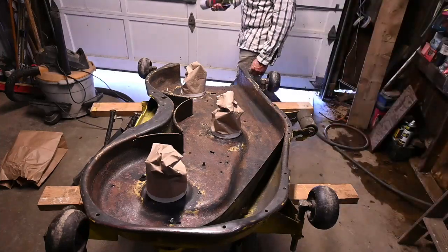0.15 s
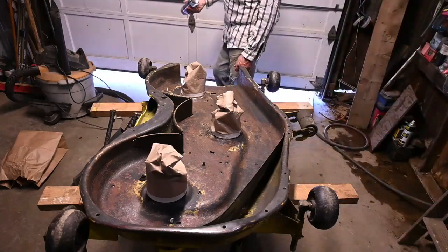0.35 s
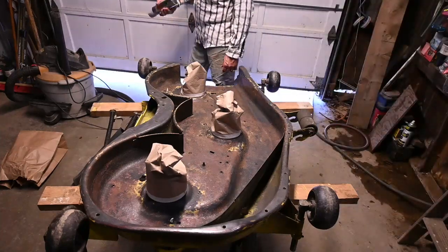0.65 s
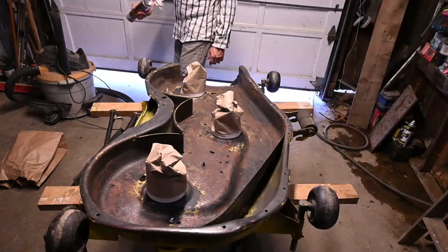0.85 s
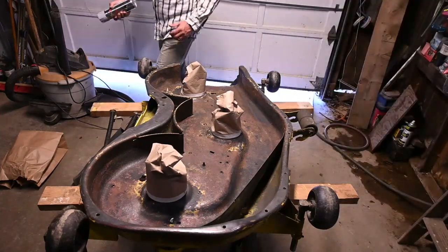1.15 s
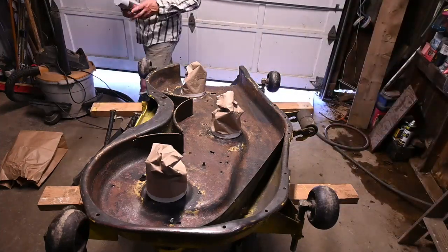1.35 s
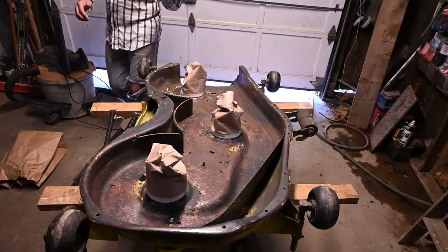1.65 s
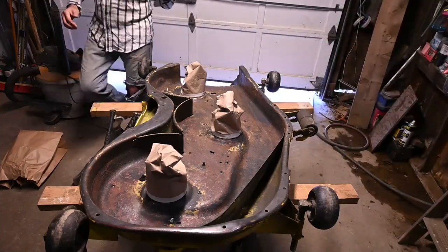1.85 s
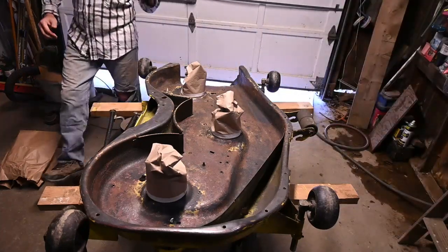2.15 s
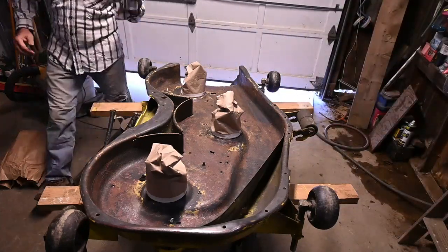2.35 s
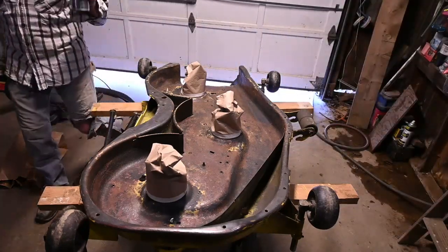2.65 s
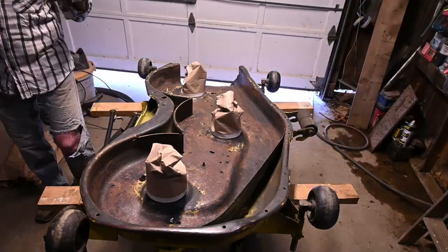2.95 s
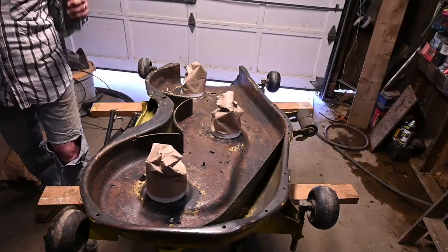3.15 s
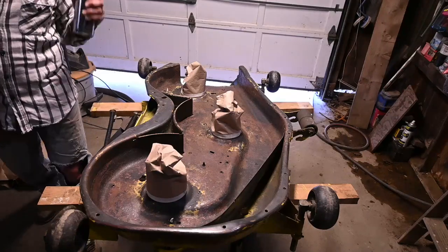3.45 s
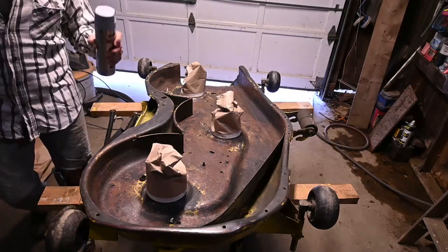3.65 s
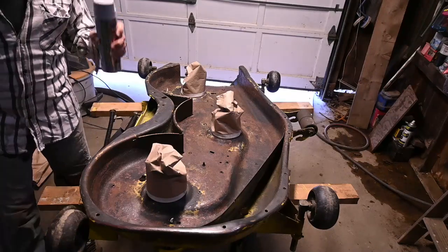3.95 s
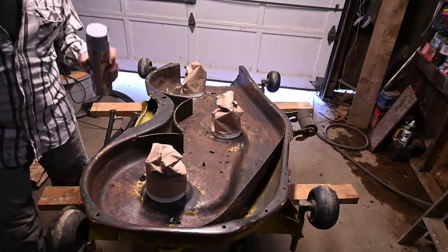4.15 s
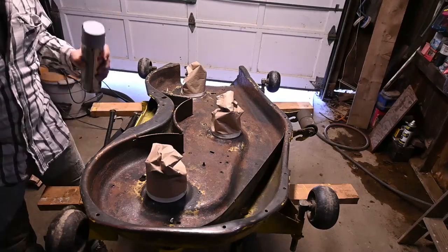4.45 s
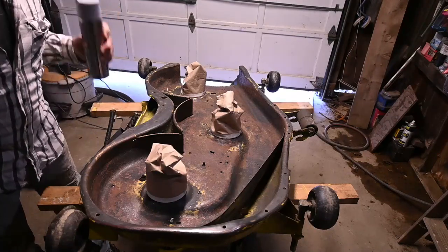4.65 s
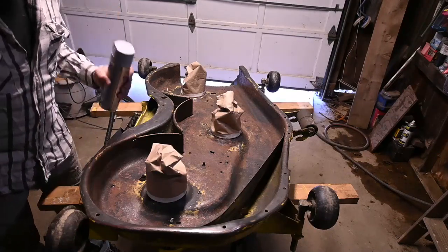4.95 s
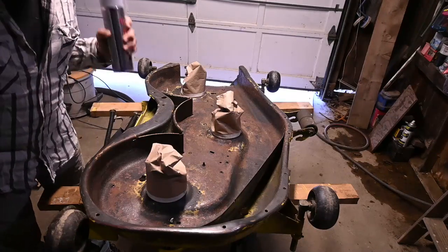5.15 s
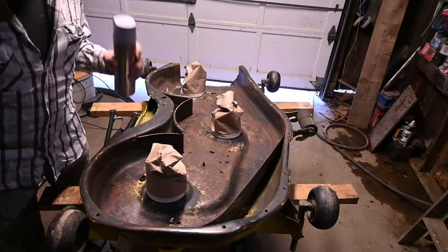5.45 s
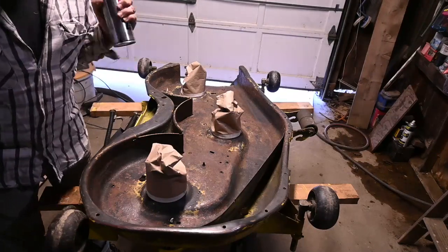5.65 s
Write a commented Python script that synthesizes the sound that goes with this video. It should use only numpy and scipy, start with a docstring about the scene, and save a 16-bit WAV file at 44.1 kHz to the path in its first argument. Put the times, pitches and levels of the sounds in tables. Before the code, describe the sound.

Sharp, dry rattling of a mixing ball inside a metal paint can, with short room echoes, faint shoe scuffs and a quiet bassy outdoor rumble.

```python
"""Quick metallic knocks come first: a spray can shaken in a garage, over a quiet outdoor rumble.
Its ball strikes the paint-damped steel shell, which rings in short modes and detunes from blow to blow.
The holder walks from the middle to the left of a two-port microphone; single echoes and the room answer.
Shoes add decaying thuds and lumpy scuffs of noise on the concrete; shaped noise makes the rumble."""
import sys
import numpy as np
from scipy import signal
from scipy.fft import rfft, irfft
from scipy.io import wavfile
from scipy.ndimage import uniform_filter1d

SR = 44100
rng = np.random.default_rng(int(sys.argv[2]) if len(sys.argv) > 2 else 0)


def dump_mix(stems):
    """Bounce the given channels to the path in sys.argv[1] as a 16-bit WAV at rate SR."""
    frames = np.atleast_2d(stems).T  # one column per channel
    limited = np.clip(frames, -1, 1)  # hard clip at full scale
    pcm = np.round(limited * 32767).astype(np.int16)
    wavfile.write(sys.argv[1], SR, pcm)


N = 255780

# Ball blows: (time [s], direct peak at the left port [dB], favoured pitch [Hz],
# level of the steel's modes above 2 kHz [dB])
BALL_BLOWS = [(.042, -25.5, 1550, -12), (0.114, -32, 1550, -10.5), (.179, -30, 1680, -5),
              (0.216, -9.5, 3480, 1.5), (.258, -14, 4130, -3), (.367, -18, 1520, -4.5),
              (0.409, -31.5, 1750, -14.5), (.467, -8, 3350, 7), (.492, -18.5, 3690, -4),
              (0.754, -27, 1644, -6.5), (.854, -27.5, 1640, -2.5), (.918, -30.5, 1730, -5.5),
              (0.952, -32.5, 1730, -9), (0.963, -10, 2860, 10.5), (.998, -22, 5070, 4),
              (1.033, -21, 3500, -5), (1.051, -33, 1750, -11), (1.159, -20.5, 1560, -3.5),
              (1.237, -25, 1510, -7.5), (1.25, -32, 1550, -1), (1.284, -12.5, 3930, -3.5),
              (1.324, -31, 1300, -5), (1.353, -31.5, 1480, -7), (1.4, -32.5, 1750, -1.5),
              (1.416, -20.5, 2570, 4), (1.418, -29.5, 790, -16.5), (1.52, -36, 1170, 0),
              (1.545, -39.5, 1780, -10), (1.564, -21.5, 2800, -8), (1.63, -26, 1270, 0),
              (1.688, -38, 1710, 5), (1.772, -32, 1780, 3), (1.856, -26.5, 1980, 3.5),
              (2.108, -18, 2920, -1.5), (2.146, -23.5, 2550, -1), (2.204, -25.5, 1990, 1),
              (2.26, -28.5, 2180, -7.5), (2.273, -31.5, 1640, -3), (2.343, -29.5, 1920, 2),
              (2.416, -38.5, 1490, 2), (2.464, -30, 1480, -2), (2.552, -27, 1760, 4),
              (2.617, -28.5, 1840, 0), (2.683, -19, 2830, -1), (2.829, -28, 1930, -6),
              (2.89, -23, 1720, -6), (2.9, -35, 1600, -5), (2.916, -29.5, 1830, 3), (2.937, -29.5, 4250, 3),
              (3.012, -23, 1760, -1.5), (3.03, -29, 1440, 11), (3.021, -33.5, 2800, 1),
              (3.045, -30.5, 3000, -4), (3.058, -30.5, 3650, 14), (3.153, -36.5, 1270, -2),
              (3.283, -21.5, 2420, -10.5), (3.43, -32.5, 1730, -8), (3.45, -25.5, 1630, -6.5),
              (3.517, -15.5, 2710, -5.5), (3.639, -27.5, 1840, -8), (3.711, -31.5, 2060, -9.5),
              (3.731, -26, 1310, 2), (4.001, -25, 2340, -4.5), (4.024, -14.5, 2530, -1),
              (4.093, -32, 1090, 3), (4.187, -9, 2970, 11.5), (4.221, -30, 1640, -22),
              (4.24, -21.5, 1710, -3.5), (4.324, -14, 2900, -2.5), (4.434, -25.5, 1810, 0),
              (4.446, -30, 1510, 5), (4.462, -7, 3930, -0.5), (4.491, -22.5, 1720, -5.5),
              (4.509, -20.5, 1790, -3), (4.531, -23, 1900, 2), (4.598, -11.5, 2620, -6.5),
              (4.666, -26, 1260, 1), (4.73, -22.5, 1500, -10.5), (4.782, -29, 1820, -9),
              (4.794, -28, 1740, -5), (4.805, -26, 1790, -6.5), (4.999, -27, 1700, -6.5),
              (5.067, -41, 2200, -14), (5.071, -11, 2550, -5.5), (5.189, -36.5, 1330, -3),
              (5.241, -29.5, 1590, -3.5), (5.304, -34, 1980, -12), (5.327, -32, 1210, -2.5),
              (5.449, -37, 2020, -9.5), (5.565, -37.5, 1350, -6), (5.584, -14.5, 2530, -6),
              (5.644, -31, 1510, 1), (5.692, -25.5, 1240, -1), (5.76, -35, 1500, -9),
              (5.771, -27.5, 1810, -3)]
# Bearing of the walker: (time [s], lead of the left port [microseconds])
WALKER_LEAD = [(0, -10), (.5, 18), (1.2, 35), (2.1, 35), (2.7, 55), (3.3, 62)]
# Place and grip of the walker: (time [s], send to the walls against the direct sound [dB],
# boom of the modes below 1.7 kHz [dB])
WALKER_PLACE = [(0, -6, -15), (.4, -2, -9), (.8, -0.5, -2), (1.2, -2, -12), (1.4, 0.5, -12), (1.7, -6, 0),
                (2.1, -6.5, -1), (2.25, -5, -2.5), (2.8, -3.5, -2), (3.0, -2.5, -11.5), (3.4, -6, -9),
                (4.1, -5, -3), (4.65, -8.5, -10), (5.05, -7.5, -5.5), (5.3, 0, -13), (5.6, -3.5, -3.5),
                (5.8, -8.5, -8.5)]
# Harder blows carry more direct sound: send change [dB per dB] of blow level, applied to every blow and zero at
# a pivot level [dB]
SEND_DB_PER_DB, PIVOT_DB = -0.0433, -24
CAN_ROOM_DB = 5  # added to the room sound, not to the single echoes


def can(places=4):
    """Blows reach the ports directly, by single echoes and by rooms that differ from place to place."""
    direct = np.zeros((2, N))
    sends = np.zeros((places, N))
    t = np.arange(1200) / SR
    blows = list(BALL_BLOWS) + bounces()
    spots = rng.standard_normal((len(blows), 3, len(CAN_MODES)))
    walk_s, walk_send_db, walk_boom_db = np.transpose(WALKER_PLACE)
    for k, (s, db, pitch_hz, edge_db) in enumerate(blows):
        lead_s = np.interp(s, *np.transpose(WALKER_LEAD)) * 1e-6
        boom_db = np.interp(s, walk_s, walk_boom_db)
        send_db = np.interp(s, walk_s, walk_send_db) + SEND_DB_PER_DB * (db - PIVOT_DB)
        pair = knock(np.array([t, t - lead_s]), pitch_hz, boom_db, edge_db, spots[k])
        add(direct, s, pair * gain_of(db) / abs(pair[0]).max())
        # the walls hear the can from all sides at once, so the quirks of one direction average out
        averaged_spot = [[.35], [.35], [1]] * spots[k]
        around = knock(t[None], pitch_hz, boom_db, edge_db, averaged_spot)
        add(sends[k % places][None], s, around * gain_of(db + send_db) / abs(around).max())
    room = sum(signal.fftconvolve(send[None], garage(), axes=1)[:, :N] for send in sends)
    return direct + single_echoes(sends.sum(0)) + gain_of(CAN_ROOM_DB) * room


BOUNCE_DB, BOUNCE_S = -25, .03  # lowest level against the blow, time scale of the wait


def bounces(count=2):
    """The ball skips on faintly after each blow, at random waits, levels and pitches."""
    wait, size, pitch = rng.random((len(BALL_BLOWS), count, 3)).T
    blows = np.array(BALL_BLOWS)
    s = blows[:, 0] + .004 - BOUNCE_S * np.log(wait + .01)
    db = blows[:, 1] + BOUNCE_DB + 10 * size
    pitch_hz = 1500 * 2.5 ** pitch
    edge_db = -8
    rows = zip(s.flat, db.flat, pitch_hz.flat)
    return [(a, b, c, edge_db) for a, b, c in rows if a < N / SR]


# Modes of the half-full can: (frequency [Hz], relative level [dB], decay by 60 dB [s])
CAN_MODES = [(598, -4, 0.0094), (805, -10, 0.025), (1077, 2.74, 0.0076), (1587, 3, 0.0077),
             (1851, 1, 0.013), (2243, 4.5, 0.0048), (2875, 0.5, 0.007), (3554, 4.5, 0.0053),
             (4220, 7.5, 0.0039), (4970, 16, 0.0015), (6170, 16, 0.0018), (7680, 8, 0.0021),
             (8990, 6.5, 0.0022), (10470, 8, 0.0014), (12100, 7.5, 0.0014), (13610, 5.5, 0.0023),
             (15060, 1, 0.0025)]
DETUNE = .022  # sloshing paint shifts each mode from blow to blow (share of its pitch, one sigma)


def knock(t, pitch_hz, boom_db, edge_db, spot):
    """Contact time favours one pitch; the struck spot scatters the modes' levels and phases."""
    level_draw, phase_draw, tune_draw = spot
    hz, db, t60 = np.transpose(CAN_MODES)
    contact = gain_of(-30.0 * np.log2(hz / pitch_hz) ** 2)
    boom = gain_of(boom_db) * (hz < 1700)
    edge = gain_of(edge_db) * (hz > 2000)
    sign = (-1) ** np.arange(len(hz))  # neighbouring modes start in opposite directions
    size = (contact + boom + edge) * gain_of(db + 2.7 * level_draw) * sign
    t = np.maximum(t - .0002, 0)[..., None]
    onset = (1 - np.exp(-t / 0.00019)) ** 2  # the ball takes a moment to load the wall
    decay = np.exp(-np.log(1000) * t / t60)
    ring = np.sin(2 * np.pi * hz * (1 + DETUNE * tune_draw) * t + 1.1 * phase_draw)
    return (size * onset * decay * ring).sum(-1)


# Single reflections: (delay [s], level [dB], lead of the left port [microseconds])
REFLECTIONS = [(.0035, -11.5, 1), (0.0126, -8.5, 61), (0.0103, -34, -48)]


def single_echoes(sent):
    """Each reflecting surface returns one delayed copy, reaching the ports at slightly different times."""
    hz = np.fft.rfftfreq(N, 1 / SR)
    spectrum = rfft(sent)
    echoes = np.zeros((2, N))
    for delay, db, lead_us in REFLECTIONS:
        arrival = delay + np.array([[0], [lead_us * 1e-6]])
        shift = np.exp(-2j * np.pi * hz * arrival)
        echoes += gain_of(db) * irfft(spectrum * shift, N)
    return echoes


# Decay of the garage: (frequency [Hz], decay by 60 dB [s])
GARAGE_DECAY = [(300, 0.35), (800, 0.56), (2100, 0.36), (5500, 0.3), (14600, 0.23)]
BUILD_S = 0.0013  # the room sound rises over this time


def garage():
    """A room response: noise that builds up, then dies band by band."""
    length = SR // 2
    t = np.arange(length) / SR
    white = diffuse(length, [(1, 0), (2, 0)])
    hz, frame_s, bands = signal.stft(white, SR, nperseg=256)
    fade = gain_of(-60 * frame_s / read(GARAGE_DECAY, hz)[:, None])
    tail = signal.istft(bands * fade, SR, nperseg=256)[1][:, :length]
    build = np.clip(t / BUILD_S, 0, 1)
    tail = tail * build * (1 + 1.26 * np.exp(-t / 0.006))  # early reflections carry more energy
    # clutter returns separate echoes before they blend; the smoothing shrinks the factor of 24
    grain_db = 24 * uniform_filter1d(rng.standard_normal(length), size=40) * np.exp(-t / .08)
    tail = tail * gain_of(grain_db)
    return tail / np.linalg.norm(tail[0])


# Footfalls: (time [s], starting level [dB], pitch [Hz])
FOOTFALLS = [(2.436, -41, 290), (2.452, -41.5, 176), (4.252, -38.5, 484)]
# Soles dragged on concrete: (start [s], length [s], level before lumps and swell [dB])
SOLE_DRAGS = [(0.63, 0.42, -69), (1.712, .15, -69), (3.825, 0.18, -57)]
# Spectrum of the grit: (frequency [Hz], relative density [dB per Hz])
GRIT_COLOUR = [(120, -6), (300, 1), (600, -2.5), (1500, -4.5), (4000, -12.5), (12000, -31)]


def shoes():
    """Dull sine thuds with a puff of grit, and lumpy drags that swell and fade, with room sound."""
    out = np.zeros((2, N))
    t = np.arange(3000) / SR
    for s, db, pitch_hz in FOOTFALLS:
        puff = gain_of(2.5) * diffuse(len(t), GRIT_COLOUR) * np.minimum(t / 0.005, 1)
        thud = np.sin(2 * np.pi * pitch_hz * t) + puff
        add(out, s, gain_of(db - 60 * t / 0.012) * thud)
    drag_t = np.arange(SR // 2) / SR
    for s, length, db in SOLE_DRAGS:
        # the sole catches and slips; the smoothing shrinks the factor of 45
        lumps_db = 45.0 * uniform_filter1d(rng.standard_normal(SR // 2), size=300)
        swell = np.sin(np.pi * np.minimum(drag_t / length, 1))
        add(out, s, gain_of(db + lumps_db) * diffuse(SR // 2, GRIT_COLOUR) * swell)
    room = signal.fftconvolve(out, garage(), axes=1)[:, :N]
    return out + gain_of(4.5) * room


# Spectrum of the outdoor rumble: (frequency [Hz], relative density [dB per Hz])
RUMBLE_COLOUR = [(15, 4), (28, 1.5), (42, -3.5), (78, 3.5), (123, 2.5), (190, -8), (315, -3.5), (400, -9.5),
                 (1100, -7.5), (2700, -11.5), (6700, -20.5), (12000, -26.5), (16500, -25)]


def rumble():
    """Steady outdoor noise, strongest in the bass, reaching the ports from all sides."""
    return gain_of(-60.5) * diffuse(N, RUMBLE_COLOUR)


# Likeness of diffuse sound at the two ports: (frequency [Hz], correlation [0 to 1])
PORT_LIKENESS = [(60, 0.92), (300, 0.89), (1000, 0.78), (2500, 0.091), (6000, 0.072), (15000, 0.048)]


def diffuse(length, colour):
    """Noise from all sides with a given spectrum: alike at the ports in the bass, unlike in the treble."""
    hz = np.fft.rfftfreq(length, 1 / SR)
    a, b, c, d = rng.standard_normal((len(hz), 4)).T
    left = a + 1j * b
    other = c + 1j * d
    same = np.clip(read(PORT_LIKENESS, hz), -1, 1)
    right = same * left + np.sqrt(1 - same ** 2) * other
    x = irfft(np.array([left, right]) * gain_of(read(colour, hz)), length)
    return x / np.sqrt(np.mean(x ** 2))


def gain_of(db):
    """Decibels to amplitude."""
    return 10 ** (np.asarray(db) / 20)


def read(points, hz):
    """Interpolates a table over log frequency."""
    f, value = np.transpose(points)
    return np.interp(np.log(hz + 1), np.log(f + 1), value)


def add(mix, s, sound):
    """Mixes a sound into all channels of mix at time s, cut at the end."""
    part = mix[:, round(s * SR):][:, :sound.shape[1]]
    part += sound[:, :part.shape[1]]


def scene():
    """Can, shoes and the steady background."""
    return can() + shoes() + rumble()


# Treble difference of the ports: (frequency [Hz], left minus right [dB])
PORT_SHADE = [(4000, 0), (9000, -1), (14000, -2.5)]
EDGE_HZ = 16100  # upper band limit


def record(dry):
    """The two microphone ports differ a little in the treble; then a low-pass limits the band."""
    half_db = read(PORT_SHADE, np.fft.rfftfreq(N, 1 / SR)) / 2
    shaded = irfft(rfft(dry) * gain_of([half_db, -half_db]), N)
    low_pass = signal.firwin(255, EDGE_HZ, window=("kaiser", 7), fs=SR)
    return signal.oaconvolve(shaded, low_pass[None], "same")


dry = scene()
out = record(dry)
dump_mix(out)
```